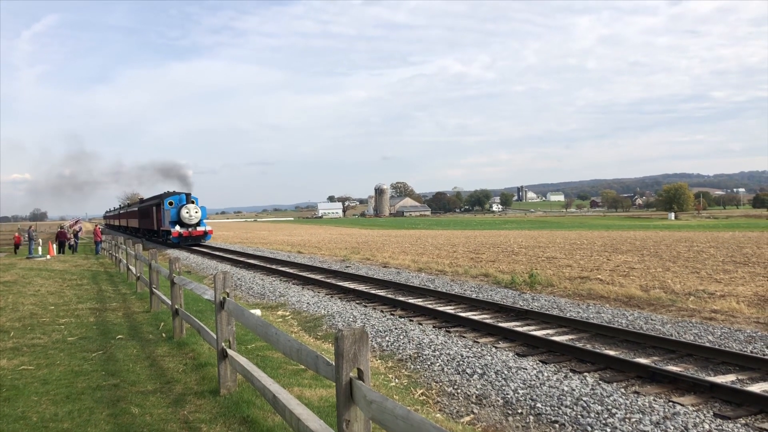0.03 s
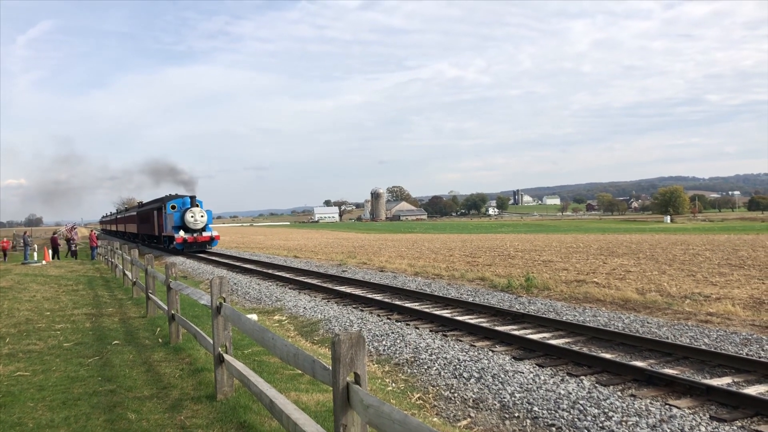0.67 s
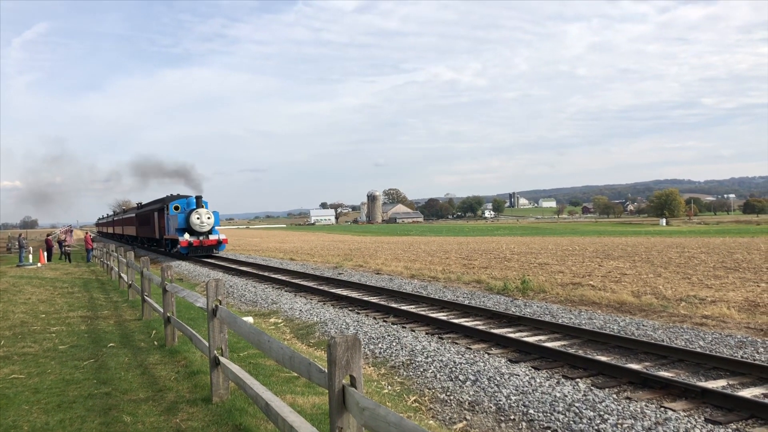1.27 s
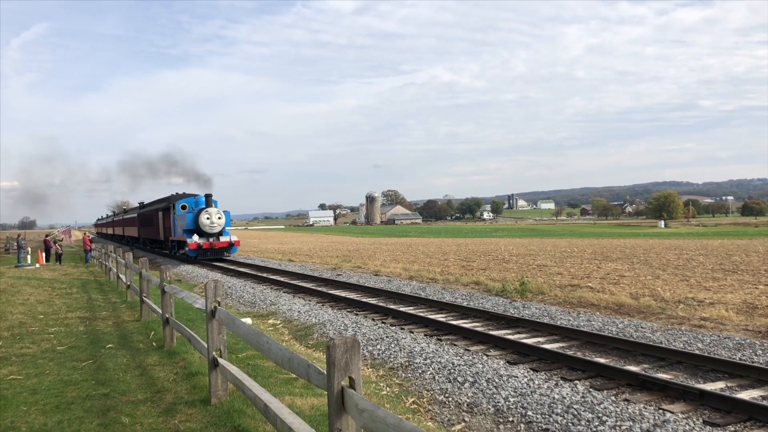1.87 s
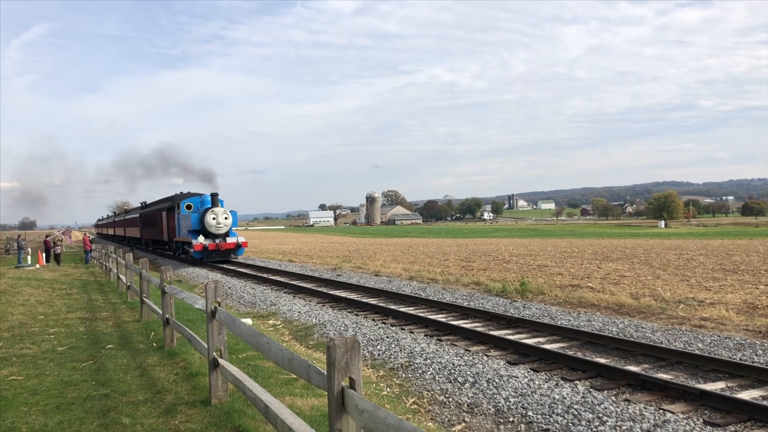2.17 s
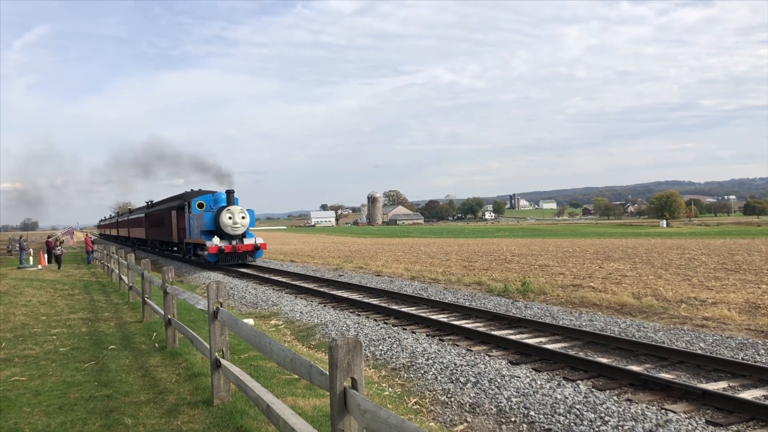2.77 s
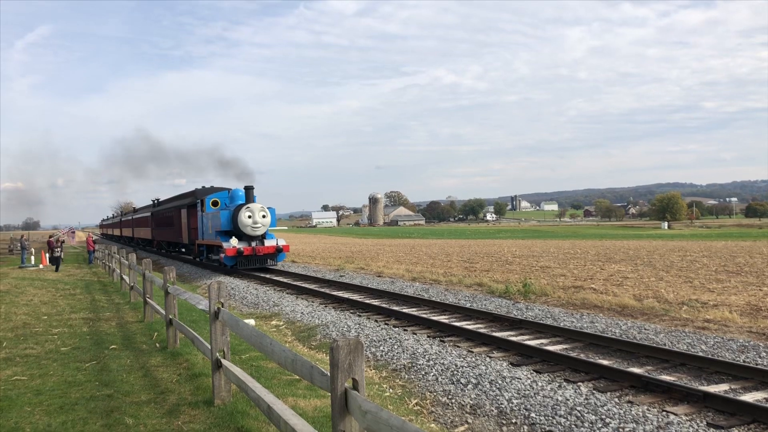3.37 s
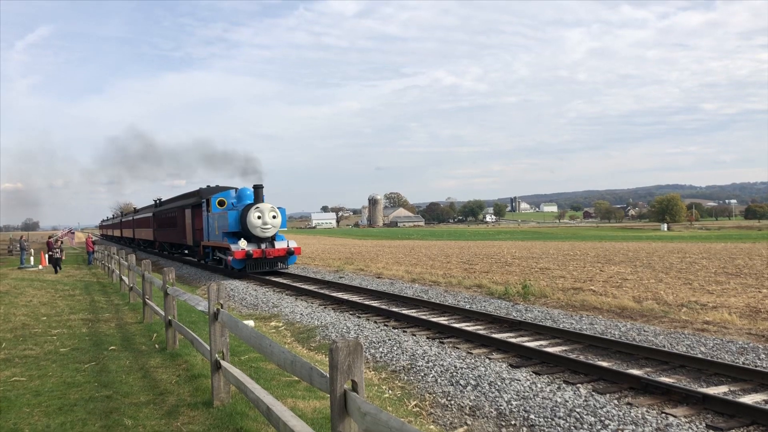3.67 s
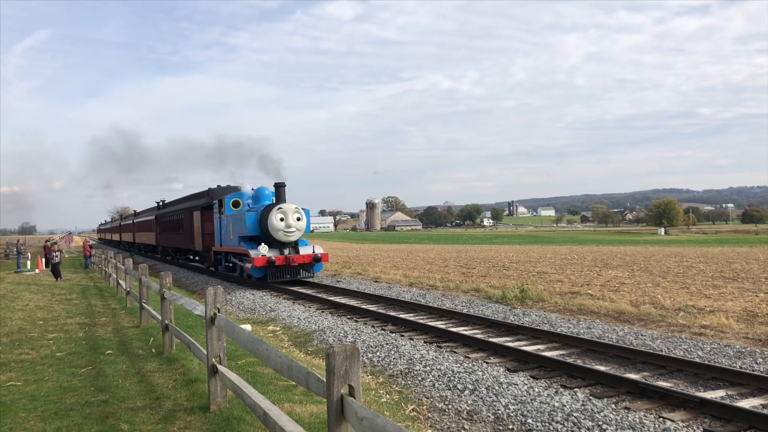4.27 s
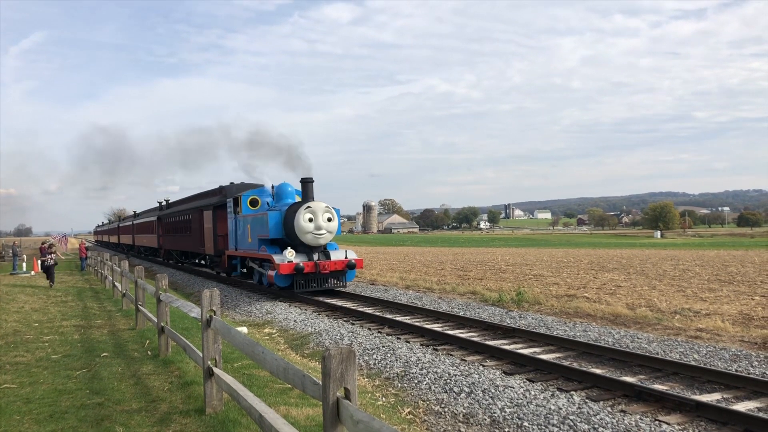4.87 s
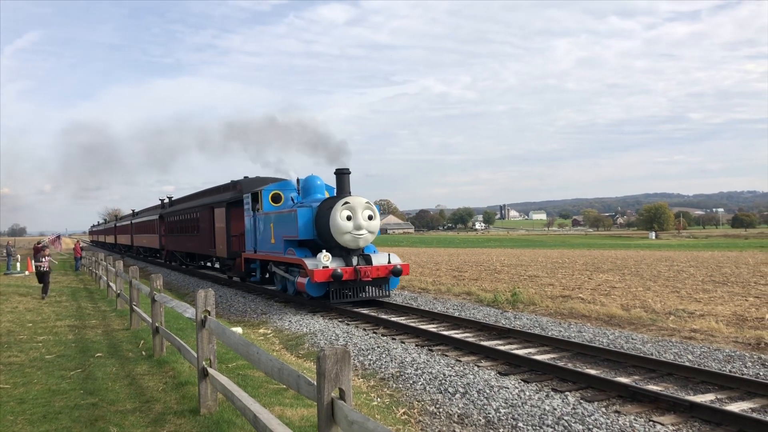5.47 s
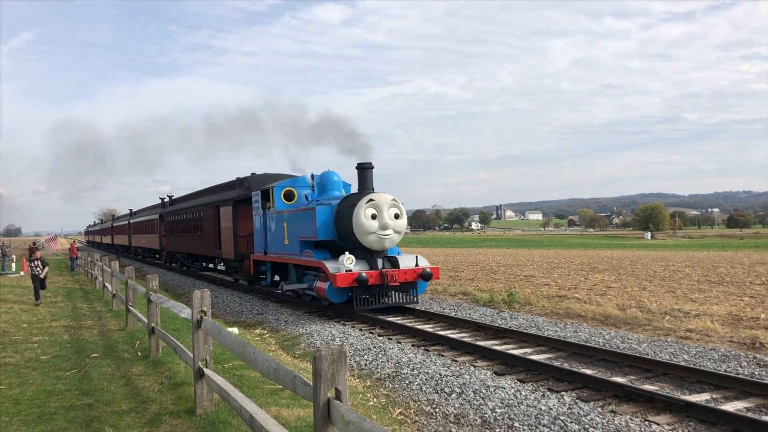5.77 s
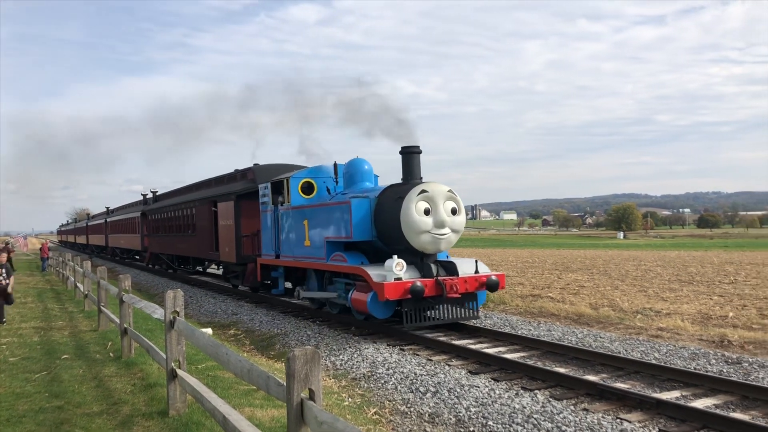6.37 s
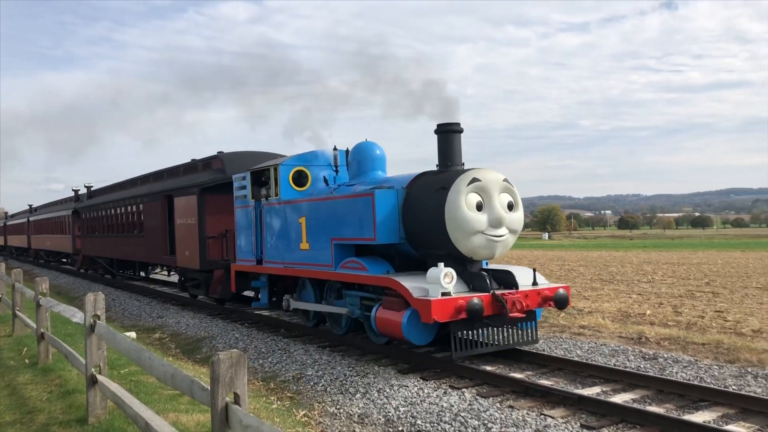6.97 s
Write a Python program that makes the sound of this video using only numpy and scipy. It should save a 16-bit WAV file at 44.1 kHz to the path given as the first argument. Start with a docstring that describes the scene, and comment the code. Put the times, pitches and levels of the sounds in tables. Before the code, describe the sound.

A small steam locomotive rolls closer across open fields with a low rumble, soft chuffing and a few metal knocks, and a wheel squeaks faintly once. About halfway through, its loud one-note whistle sounds, scooping up in pitch and sputtering amid bright hiss. After a very short break, a second blast follows. It is heard from beside the track, with a faint echo.

```python
"""A steam train whistles

A small steam locomotive rolls closer over open fields, rumbling and chuffing softly; a wheel squeaks
once. Then it blows its one-note whistle twice: long blasts that scoop up in pitch and sputter on wet
steam. The steam jet hisses brightly around the note, and the train and fields send back a faint echo."""
import sys
import numpy as np
from scipy import signal
from scipy.fft import rfft, irfft, next_fast_len
from scipy.io import wavfile

SR = 44100
rng = np.random.default_rng(int(sys.argv[2]) if len(sys.argv) > 2 else 0)


def put_to_file(sound):
    """Save the sound as 16-bit audio at rate SR, in the file named by the first command-line argument."""
    columns = np.atleast_2d(sound).T  # one column per channel
    safe = np.clip(columns, -1, 1)
    whole_steps = np.round(safe * 32767)
    wavfile.write(sys.argv[1], SR, whole_steps.astype(np.int16))


N = 318843
TIME = np.arange(N) / SR

# The tone of the wheels and rods. Each row: frequency in Hz, relative level in dB.
GEAR_SPECTRUM = [(180, -13), (300, -8.5), (350, -11), (386, -4.5), (476, -2.5), (664, -1), (903, -2),
                 (1380, -4.5), (2600, -12.5), (3380, -36), (5720, -120)]
# The tone of the exhaust steam. Each row: frequency in Hz, relative level in dB.
EXHAUST_SPECTRUM = [(1290, 8), (2200, -17.5), (2650, -4), (3180, 4), (3650, 2), (3990, -3), (5540, -9),
                    (6470, -14), (7550, -14), (11300, -25), (15500, -33)]
# How hard the whistle is blown.
# Each row: time in seconds, base level of the hiss in dB, relative level above 11 kHz in dB.
BLOWING = [(3.78, -38.0, -7.7), (4.14, -38.3, -6.9), (4.23, -35.0, -5.0), (4.63, -37.2, -6.4),
           (4.74, -30.7, -5.5), (5.0, -35.0, -5.2), (5.07, -32.3, -5.6), (5.2, -34.5, -4.6),
           (5.52, -35.5, -6.3), (5.62, -32.3, -2.8), (6.12, -32.7, -4.9), (6.27, -29.4, -5.8),
           (6.39, -32.1, -1.4), (6.54, -37.5, -7.3), (6.62, -26.7, -7.6), (6.72, -23.1, -5.2),
           (6.8, -26.3, -4.0), (6.9, -25.1, -4.8), (7.2, -31.3, -3.5)]


def from_db(db):
    """Turn decibels into a factor to multiply by."""
    return 10 ** (np.asarray(db) / 20)


def rms_one(x):
    """Scale a sound so that its average strength (rms) is 1."""
    return x / np.sqrt(np.mean(x ** 2) + 1e-20)


def in_time(rows):
    """Join rows that begin with a time into curves, one for each further column."""
    times, *columns = np.transpose(rows)
    return [np.interp(TIME, times, column) for column in columns]


def coloured(points):
    """Noise of strength 1 with a given spectrum, falling 20 dB an octave beyond its ends."""
    hz, db = np.transpose(points)
    size = next_fast_len(N, True)
    octave, known = np.log2(np.fft.rfftfreq(size, 1 / SR) + 1), np.log2(hz)
    outside = np.abs(octave - np.clip(octave, known[0], known[-1]))
    gain = from_db(np.interp(octave, known, db) - 20 * outside)
    return rms_one(irfft(rfft(rng.standard_normal(size)) * gain, size)[:N])


def drift(rate):
    """A random wander of strength 1, moving up to about `rate` times a second."""
    coarse = np.arange(-SR // 2, N + 16, 16)
    lowpass = signal.butter(2, np.clip(rate, 1, 1000), fs=SR / 16, output="sos")
    wander = signal.sosfilt(lowpass, rng.standard_normal(len(coarse)))
    return rms_one(np.interp(np.arange(N), coarse, wander))


def resonance(x, hz, width_hz):
    """Let a sound ring in a band around one frequency."""
    r = np.exp(-np.pi * width_hz / SR)
    feedback = [1, -2 * r * np.cos(2 * np.pi * hz / SR), r * r]
    return signal.lfilter(np.array([1, 0, -1]) * (1 - r * r) / 2, feedback, x)


def bump(middle, half_length):
    """A smooth swell up to 1 and back down."""
    near, out = np.abs(TIME - middle) < 4 * half_length, np.zeros(N)
    out[near] = np.exp(-((TIME[near] - middle) / half_length) ** 2)
    return out


def fading(start, t60, rise=.0003):
    """A level that rises quickly, then dies away by 60 dB in t60 seconds."""
    near, out = (TIME > start) & (TIME < start + 2 * t60), np.zeros(N)
    age = TIME[near] - start
    out[near] = (1 - np.exp(-age / rise)) * np.exp(-np.log(1000) * age / t60)
    return out


def chuffing(first_s=.052, gap_s=.187):
    """The even beat of the exhaust, from -1 to 1."""
    return np.cos(2 * np.pi * (TIME - first_s) / gap_s)


def exhaust_level(start_db=-61, db_per_s=2.49, swing_db=.9):
    """The level of the exhaust in dB: it grows as the train nears and pulses with the beat."""
    return start_db + db_per_s * TIME + swing_db * chuffing()


def rumble():
    """The rolling train rumbles, and heavy beats of the exhaust add low thumps."""
    # The tone of the rumble. Each row: frequency in Hz, relative level in dB.
    spectrum = [(20, -29), (31, -5), (43, -7.5), (60, -2), (80, -0.5), (113, -3.5), (150, -0.5), (180, 1),
                (223, -2), (260, -8.5), (300, -15), (400, -16.5)]
    # Its slow rise and fall. Each row: time in seconds, base level in dB.
    loudness = [(0.0, -42), (2.3, -39), (4.3, -37.5), (5.3, -40), (6.2, -35), (7.2, -42.9)]
    # Heavy beats. Each row: middle in seconds, level in dB.
    beats = [(.22, -39), (.76, -42), (1.18, -40.5), (1.7, -40), (2.24, -34.5), (2.5, -37.5), (2.79, -35),
             (3.35, -36), (3.6, -33.5), (4.54, -34), (6.67, -37)]
    rolling_db = in_time(loudness)[0] - .8 + .6 * chuffing() + 1.6 * drift(13)
    thumps = sum(from_db(db) * bump(s, half_length=.039) for s, db in beats)
    return np.hypot(from_db(rolling_db), thumps) * coloured(spectrum)


def running_gear(start_db=-50.5, db_per_s=2, levels_off_s=4.55):
    """Wheels and rods grind, growing louder as the train nears and then levelling off."""
    level_db = start_db + db_per_s * np.minimum(TIME, levels_off_s) - .05 * chuffing()
    return from_db(level_db + 1.2 * drift(24)) * coloured(GEAR_SPECTRUM)


def exhaust():
    """Steam chuffs softly from the chimney, with a few stronger puffs from the cylinders."""
    # Stronger puffs. Each row: middle in seconds, half length in seconds, level in dB.
    cylinder_puffs = [(0.078, 0.15, -54.5), (0.66, 0.13, -51), (1.172, .05, -52.5), (1.692, 0.14, -54),
                      (1.873, 0.076, -51.5), (2.186, .025, -48.5), (2.285, 0.048, -48.5),
                      (2.49, 0.017, -50), (2.752, 0.03, -45.5), (3.533, 0.15, -46.5)]
    puffs = sum(from_db(db) * bump(s, half_length) for s, half_length, db in cylinder_puffs)
    chuffs = from_db(exhaust_level() + 1.4 * drift(17.7))
    return np.hypot(chuffs, puffs) * coloured(EXHAUST_SPECTRUM)


def knocks():
    """Rods and rail joints knock, each a quickly fading burst of noise."""
    # The knocks. Each row: start in seconds, base level in dB, fade time in seconds.
    hits = [(.002, -39, .25), (1.06, -40, .3), (1.815, -43, .25), (2.115, -42, .25), (2.695, -35, 0.26),
            (3.035, -39, 0.17), (3.088, -39, 0.14), (3.466, -33, 0.33), (3.53, -37, .2), (4.88, -31, .2)]
    blows = sum(from_db(db) * fading(s, decay, rise=.014) for s, db, decay in hits)
    return blows * (coloured(GEAR_SPECTRUM) + from_db(-5.5) * coloured(EXHAUST_SPECTRUM))


def rods():
    """Loose steel rods tick against their pins and keep up a faint jingle that grows with the exhaust."""
    # Short metal ticks. Each row: start in seconds, level in dB.
    ticks = [(1.822, -53), (2.225, -57), (2.361, -57), (2.485, -53), (2.738, -50), (2.905, -58),
             (3.095, -47), (3.452, -55)]
    # How the steel rings. Each row: frequency in Hz, width in Hz, relative level in dB.
    rings = [(1410, 430, 5), (3050, 110, 4), (3760, 230, 0.5), (5570, 630, -10), (8500, 2200, -21)]
    rattle = sum(from_db(db) * fading(s, t60=.073) for s, db in ticks)
    steel = sum(from_db(db) * resonance(rng.standard_normal(N), hz, width) for hz, width, db in rings)
    jingle = from_db(exhaust_level() - 3.5 + 2.2 * drift(14))
    return (rattle + jingle) * rms_one(steel)


def wheel_squeak():
    """A wheel's rim rubs the rail and stirs a few high, rough tones in turn."""
    # Wheel tones. Each row: middle and half length in seconds, pitch and width in Hz, level in dB.
    tones = [(.52, .035, 15300, 600, -66), (.52, .035, 13800, 250, -70), (.55, .05, 7700, 1300, -59),
             (.59, .07, 10700, 450, -62), (0.61, 0.017, 7250, 700, -50), (.615, .022, 14700, 1500, -67),
             (.628, 0.022, 8350, 1500, -50.5), (.653, 0.029, 10700, 800, -55)]
    out = np.zeros(N)
    for s, half_length, hz, width_hz, db in tones:
        rub = resonance(rng.standard_normal(N), hz, width_hz)
        ring = resonance(rub, hz, width_hz)
        out += from_db(db) * bump(s, half_length) * rms_one(ring)
    return out


def echoes(x, dull_hz):
    """The train and the fields send back a few faint, dull copies of a sound."""
    # The echoes. Each row: delay in seconds, level in dB.
    returns = [(.036, -26), (.099, -24), (.16, -34)]
    dull = signal.sosfilt(signal.butter(1, dull_hz, fs=SR, output="sos"), x)
    return sum(from_db(db) * np.interp(TIME - delay, TIME, dull, left=0) for delay, db in returns)


def valve(lead, lag, rise, fall):
    """Steam flow from 0 to 1; the cold whistle of the first blast fills more slowly."""
    # The two blasts. Each row: opening time and closing time in seconds.
    blasts = [(3.756, 6.411), (6.563, 7.4)]
    flow = np.zeros(N)
    for (opens, closes), slowness in zip(blasts, [1.7, 1]):
        age = np.maximum(TIME - opens + lead, 0)
        filling = 1 - np.exp(-(age / (rise * slowness)) ** 1.34)
        flow += filling * np.clip((closes + lag - TIME) / fall, 0, 1)
    return flow


def shimmer(x, patchy_db):
    """Swirling air lets each band of a distant hiss swell and fade on its own."""
    size = next_fast_len(N, True)
    spectrum, hz = rfft(x, size), np.fft.rfftfreq(size, 1 / SR)
    centres = np.geomspace(1000, 15000, num=12)
    bands = (irfft(spectrum * np.interp(hz, centres, share), size)[:N] for share in np.eye(len(centres)))
    return sum(band * from_db(patchy_db * drift(12)) for band in bands)


def steam_jet():
    """Steam roars and hisses from the whistle's slot, starting just before the note."""
    # The lower part of the jet's tone. Each row: frequency in Hz, relative level in dB.
    low_spectrum = [(250, -5), (500, -15.5), (1300, -1), (1900, 0.5), (2250, -7.5), (2900, 2), (3500, 8)]
    # The upper part, used from its second row on. Each row: frequency in Hz, relative level in dB.
    high_spectrum = [(2350, -33), (4000, 3), (4560, 0.5), (5050, 2.5), (5400, 1.5), (6120, 3.5),
                     (6810, 1.5), (8940, 3), (9850, 4.5), (11700, -6), (13100, -3.5), (15500, -7)]
    noise = shimmer(coloured(low_spectrum + high_spectrum[1:]), patchy_db=1.5)
    # a close reflection off the boiler ripples the spectrum
    noise = noise + from_db(-19) * np.roll(noise, round(.00082 * SR))
    top = signal.sosfiltfilt(signal.butter(6, 11000, "high", fs=SR, output="sos"), noise)
    low = signal.sosfiltfilt(signal.butter(3, 2780, fs=SR, output="sos"), noise)
    middle = noise - top - low
    hiss_db, top_db = in_time(BLOWING)
    swing_db = hiss_db - np.mean(np.array(BLOWING)[:, 1])
    roar = from_db(-40.5 + .39 * swing_db + drift(6)) * rms_one(low)  # swings less than the hiss
    hiss = from_db(.9) * rms_one(middle) + from_db(top_db + 1 + .8 * drift(9)) * rms_one(top)
    flicker = from_db(.71 * drift(21) + .41 * drift(550))
    flow = valve(lead=.042, lag=.02, rise=.022, fall=.055)
    return (roar + from_db(hiss_db) * hiss) * flicker * flow


def chokes(droplet_gap_s=.045, droplet_dip_db=-3.5):
    """Water in the steam briefly chokes the note. Gives the dips in dB; deeper ones last longer."""
    # Slugs of water. Each row: middle in seconds, dip in dB.
    slugs = [(4.393, -3.4), (4.45, -2.6), (4.938, -8.1), (5.073, -3.9), (5.258, -3.3), (5.424, -6.0),
             (5.893, -7.2), (5.926, -7.9), (5.951, -6.5), (5.978, -4.3), (6.018, -10.7), (6.054, -12.5),
             (6.121, -4.1), (6.154, -7.0), (6.202, -5.7), (6.294, -6.1), (6.323, -6.4), (6.364, -5.9),
             (6.649, -6.6), (6.695, -6.2), (6.823, -7.1), (6.938, -7.0)]
    # Spells when droplets make the note stutter lightly. Each row: start and end in seconds.
    wet_spells = [(5.48, 5.88), (6.72, 6.81)]
    droplets = [(s + droplet_gap_s * rng.uniform(-.25, .25), droplet_dip_db * rng.uniform(.7, 1.2))
                for start, end in wet_spells
                for s in np.arange(start + droplet_gap_s / 2, end, droplet_gap_s)]
    return sum(db * bump(s, half_length=.0033 - .00055 * db) for s, db in slugs + droplets)


def whistle():
    """Steam sounds a nearly pure pipe note, flat while the pressure is low, with weak overtones."""
    # The pitch climbs as hot steam fills the bell. Each row: time in seconds, pitch in Hz.
    pitch_curve = [(3.82, 813.1), (3.95, 822.3), (4.18, 833.0), (4.27, 843.9), (4.6, 855.2), (4.95, 859.3),
                   (5.22, 868.8), (5.33, 863.9), (5.6, 868.2), (5.66, 872.8), (5.8, 878.9), (5.89, 869.2),
                   (6.38, 866.1), (6.6, 863.4), (6.75, 868.7), (7.1, 867.8), (7.2, 873.3)]
    # How loud the note is. Each row: time in seconds, level in dB.
    loudness = [(3.8, -9.2), (3.94, -7.6), (4.18, -7.0), (4.29, -8.2), (4.7, -6.7), (4.82, -8.6),
                (4.92, -6.5), (5.4, -8.5), (5.7, -7.9), (5.83, -9.9), (5.98, -9.6), (6.15, -9.4),
                (6.28, -4.5), (6.39, -6.1), (6.7, -5.5), (6.9, -7.0), (7.0, -8.1), (7.21, -6.4)]
    # Overtones grow as the whistle is blown harder.
    # Each row: time in seconds, then base levels in dB at 2, 3 and 4 times the pitch.
    overtones = [(3.9, -37, -46, -52), (4.3, -54, -44.5, -54), (4.47, -39, -41.4, -37),
                 (4.65, -43.5, -43.5, -60), (4.9, -45.5, -38.7, -50), (5.45, -41.5, -53, -40.5),
                 (5.77, -36, -41, -41), (6.12, -31, -43.5, -65), (6.35, -27.5, -35, -37),
                 (6.75, -25.0, -35.6, -27), (7.05, -32.5, -33.5, -31.5), (7.2, -29.2, -38, -34)]
    pitch, = in_time(pitch_curve)
    level_db, = in_time(loudness)
    pressure = valve(lead=.00094, lag=0, rise=.014, fall=.0135)
    choke_db = chokes()
    scoop = 1 - .11 * (1 - pressure) ** 1.41
    waver = 1 + .00212 * drift(76) + .0017 * drift(16.3)
    phase = 2 * np.pi * np.cumsum(pitch * scoop * waver) / SR
    shake = .05 * choke_db * drift(48)  # each choke also shakes the air in the pipe
    note = np.sqrt(2) * from_db(level_db + choke_db + .4 * drift(59)) * np.sin(phase + shake)
    # weak overtones flutter and fade, strong ones lock firmly to the note
    for multiple, db in enumerate(in_time(overtones), 2):
        flutter_db = np.interp(db, [-45, -30], [2.6, .9])
        wander_db = flutter_db * (.8 * drift(19) + .5 * drift(4))
        note += from_db(db + .5 + wander_db) * np.sin(multiple * phase + .15 * flutter_db * drift(91))
    # swirling steam rings in the bell, louder when more of it flows
    jet_db = in_time(BLOWING)[0]
    bell_noise = rms_one(resonance(rng.standard_normal(N), hz=890, width_hz=99))
    ringing = from_db(jet_db - 6) * bell_noise
    # each choke spits a little broad noise
    spit_noise = rms_one(resonance(rng.standard_normal(N), hz=1260, width_hz=610))
    spit = from_db(jet_db - 20.5) * np.abs(choke_db) * spit_noise
    return pressure * (note + ringing + spit)


def scene():
    """The whistle and its echoes over the rolling train, in one channel."""
    blast = whistle() + steam_jet()
    train = rumble() + running_gear() + exhaust() + knocks() + rods() + wheel_squeak()
    return (blast + echoes(blast, dull_hz=8000) + train)[None]


def record(dry):
    """Round off the highest peaks of the note and cut the very top of the treble steeply."""
    round_above, headroom, cutoff_hz = .85, .12, 15750
    over = np.maximum(np.abs(dry) - round_above, 0)
    rounded = dry - np.sign(dry) * (over - headroom * np.tanh(over / headroom))
    return signal.sosfilt(signal.ellip(12, .1, 80, cutoff_hz, fs=SR, output="sos"), rounded)


dry = scene()
out = record(dry)
put_to_file(out)
```